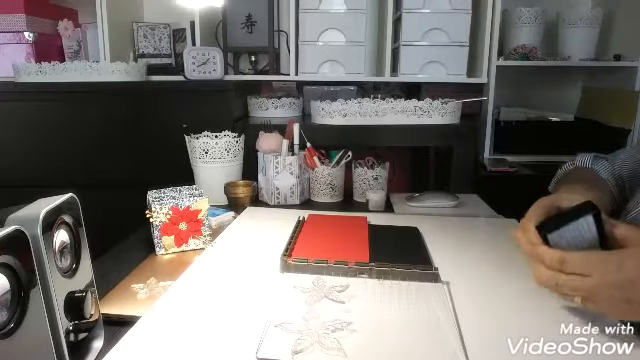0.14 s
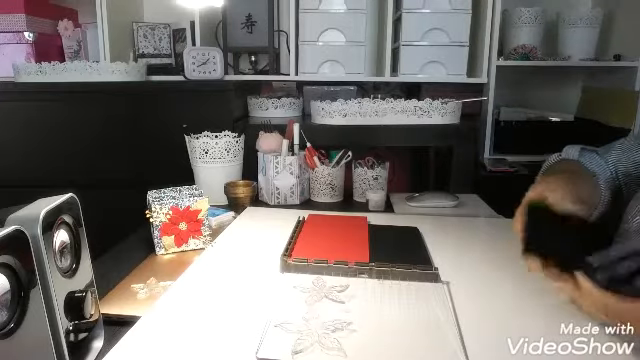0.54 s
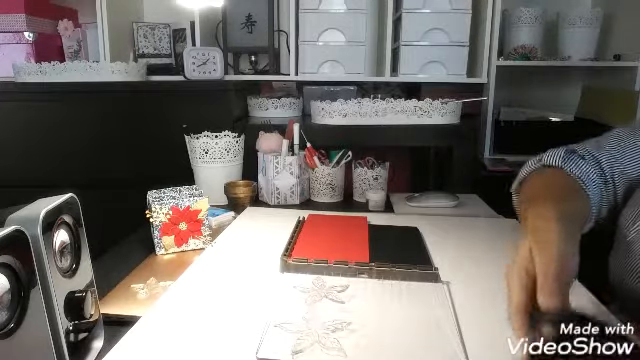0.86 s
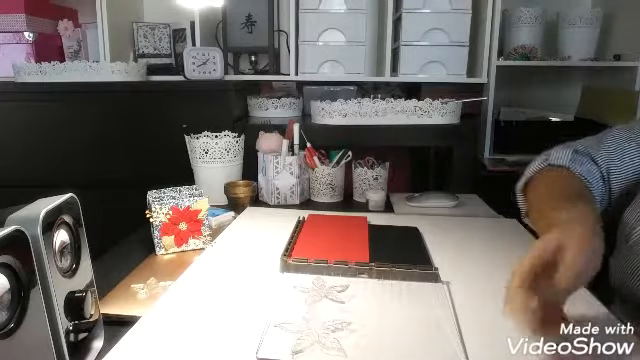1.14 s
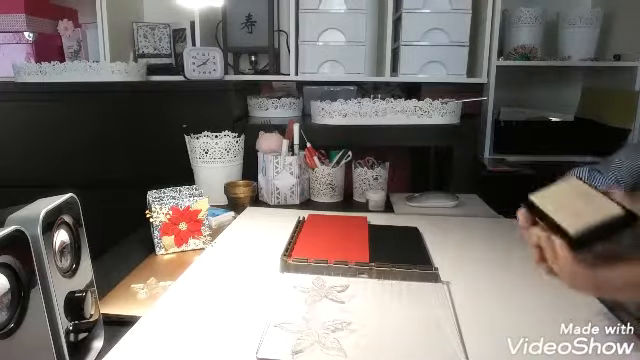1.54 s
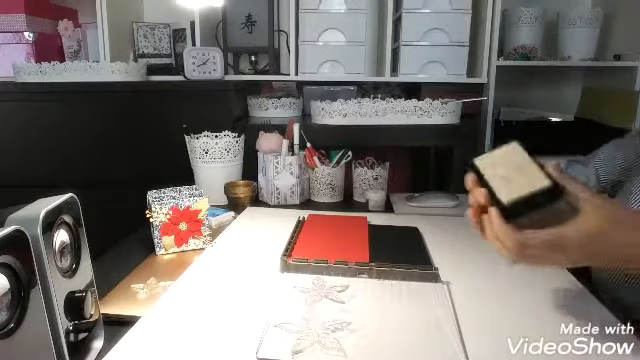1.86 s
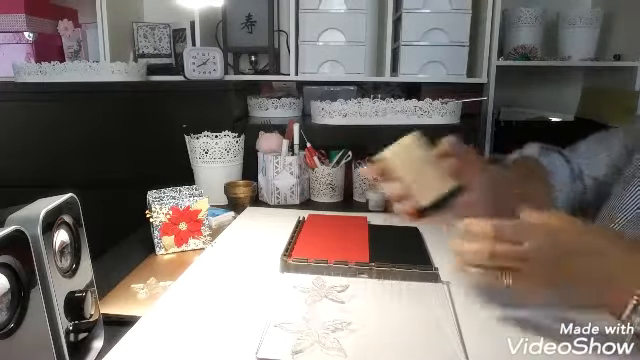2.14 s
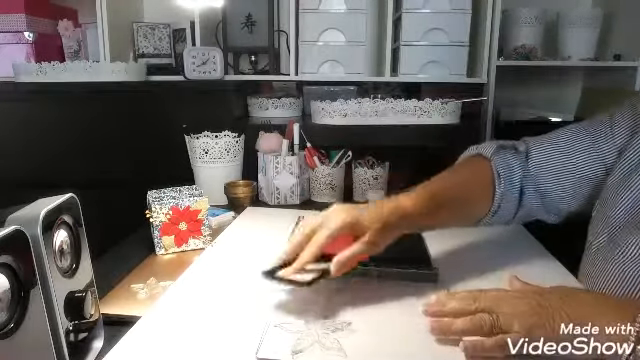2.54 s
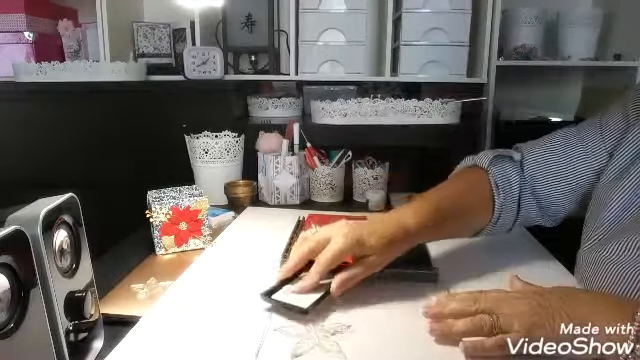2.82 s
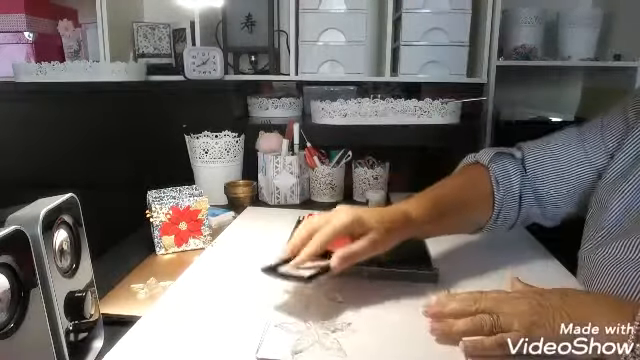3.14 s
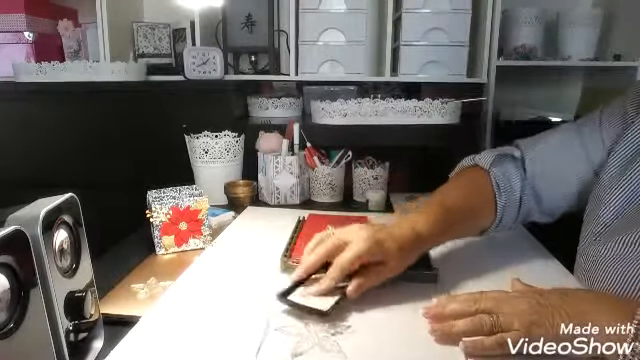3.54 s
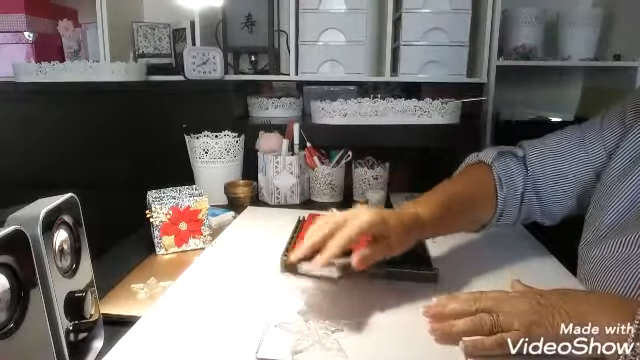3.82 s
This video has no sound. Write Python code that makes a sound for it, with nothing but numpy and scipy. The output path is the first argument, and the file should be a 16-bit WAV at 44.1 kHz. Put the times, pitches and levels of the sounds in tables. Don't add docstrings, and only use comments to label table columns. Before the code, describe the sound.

Close, nearly mono phone pickup in a small furnished room with faint hiss. Small finger creaks, then a plastic lid bounces and settles on a table in a sharp quick clatter around one second. After a quiet reach with faint sleeve rub, an ink pad is dabbed on a stamp: soft muffled pats, several firmer hard plastic knocks and tiny crackles as it lifts.

```python
import sys
import numpy as np
from scipy import signal
from scipy.fft import rfft, irfft
from scipy.io import wavfile
from scipy.ndimage import uniform_filter1d

SR = 44100
rng = np.random.default_rng(int(sys.argv[2]) if len(sys.argv) > 2 else 0)


def to_wav(s):
    ch = np.atleast_2d(s).T
    pcm = np.round(np.clip(ch, -1, 1) * 32767)
    wavfile.write(sys.argv[1], SR, pcm.astype(np.int16))


def undo_db(level):
    steps = np.asarray(level, float) / 20
    return 10 ** steps


N = 258988

# frequency in Hz, level in dB, 60 dB decay in seconds.
CASE_MODES = [(716, -34, 0.51), (760, 18, 0.87), (1300, 5.5, 0.22), (1290, -25, 0.098),
              (1592, -31.5, 0.048), (1622, -48.5, 0.41), (1836, -1, 0.44), (2055, 27.5, 0.074),
              (2120, -39, 0.3), (2640, -11, 0.043), (2860, -18, 0.61), (3230, -2, 0.17), (3580, 13, 0.028),
              (3770, -41.5, 0.48)]
# frequency in Hz, level in dB per Hz.
PLASTIC_CRACK = [(1470, -2), (2500, -8.5), (2850, -5.5), (3460, -8), (4170, -5.5), (6150, -5), (7830, -10),
                 (9290, -19), (11500, -13), (14000, -37), (16000, -65)]
CASE_RING = dict(shorten=.075, ring_db=-8)


def colour(x, points):
    hz, db = np.transpose(points)
    grid = np.fft.rfftfreq(4096, 1 / SR)
    log_gain = np.interp(np.log(grid + 1), np.log(hz), db) * np.log(10) / 20
    cepstrum = irfft(log_gain)
    cepstrum[1:2048] *= 2
    cepstrum[2049:] = 0
    response = irfft(np.exp(rfft(cepstrum)))
    return signal.fftconvolve(x, response)[:len(x)]


def level(x, db):
    return x * undo_db(db) / np.sqrt(np.mean(x ** 2))


def peak(x, db):
    return x * undo_db(db) / np.sqrt(uniform_filter1d(x ** 2, size=176).max())


def add(out, s, x):
    i = int(s * SR)
    out[i:i + len(x)] += x[:N - i]


def microphone_hiss():
    # frequency in Hz, level in dB per Hz.
    hiss_colour = [(15, -47), (26, -0.5), (54, -20), (85, -6), (180, -5.5), (414, -10), (572, -12.5),
                   (1030, -12), (1150, -12.5), (1670, -14.5), (2310, -17.5), (10100, -29.5), (14800, -28),
                   (16000, -49.5)]
    # frequency in Hz, side minus mid in dB.
    hiss_width = [(60, -1), (110, -19), (200, -14), (380, -10.5), (700, -9.5), (1290, -13.5), (2380, -8),
                  (4400, -5), (8120, -2), (15000, -6)]
    mid = colour(rng.standard_normal(N), hiss_colour)
    side = colour(colour(rng.standard_normal(N), hiss_colour), hiss_width)
    return (mid + side * np.array([[1], [-1]])) * undo_db(-71) / np.std(mid)


def room(x):
    # frequency in Hz, 60 dB decay in seconds.
    room_decay = [(100, 0.22), (300, 0.23), (1200, 0.24), (4000, 0.22), (12000, 0.22)]
    start_s = 0.00043
    t = np.arange(SR // 2) / SR
    hz, t60 = np.transpose(room_decay)
    tail = 0
    for centre in 60 * 2 ** np.arange(0, 8, .5):
        edges = [centre / 2 ** .25, centre * 2 ** .25]
        band = signal.butter(2, edges, "bandpass", fs=SR, output="sos")
        fade = np.exp(-np.log(1000) * t / np.interp(np.log(centre), np.log(hz), t60))
        tail = tail + signal.sosfilt(band, rng.standard_normal(len(t))) * fade
    tail = tail * (1 - np.exp(-(t / start_s) ** 2))
    return signal.fftconvolve(x, tail / np.sqrt(np.sum(tail ** 2)))[:N]


def early_echoes(near):
    # delay in seconds, level in dB.
    bounces = [
        (.0012, -16.5),
        (.0044, -13.5),
        (.009, -6),
        (.0132, -0.5),
        (.02, -10),
    ]
    dull = colour(near, [(2500, -3.5), (6000, -13.5), (14000, -8)])
    out = np.zeros(N)
    for k, (s, db) in enumerate(bounces):
        out += undo_db(db) * np.roll(dull, int(s * SR)) * (-1) ** k
    return out


def rustle():
    # start, fullest moment and end in seconds, level in dB.
    reaches = [
        (0.52, 0.703, 1.05, -71),
        (1.298, 1.761, 2.45, -71),
    ]
    # frequency in Hz, level in dB.
    cloth_colour = [(300, -31), (800, -8), (1400, -2.5), (2400, -4), (4000, -14), (7000, -12.5),
                    (12000, -26)]
    edge_db = -11
    t = np.arange(N) / SR
    gain = 0
    for start_s, full_s, end_s, db in reaches:
        swell_db = np.interp(t, [start_s, full_s, end_s], [edge_db, 0, edge_db], -60, -60)
        gain = gain + undo_db(db + swell_db)
    flutter = level(uniform_filter1d(rng.standard_normal(N), size=1500), 0)
    cloth = level(colour(rng.standard_normal(N), cloth_colour), 0)
    return uniform_filter1d(gain, size=2000) * undo_db(0.53 * flutter) * cloth


def ring(x, modes, shorten, scatter_db):
    t = np.arange(len(x)) / SR
    hz, db, t60 = np.transpose(modes)[:, :, None]
    gain_chance, pitch_chance = rng.standard_normal((2, len(modes), 1))
    fade = np.exp(-np.log(1000) * t / (shorten * np.clip(t60, .02, .3)))
    tone = np.sin(2 * np.pi * hz * (1 + 0.031 * pitch_chance) * t)
    bank = undo_db(db + scatter_db * gain_chance) * fade * tone
    return signal.fftconvolve(x, bank.sum(0))[:len(x)]


def chatter(time_s, swell, first, spread_db):
    t = np.arange(SR // 4) / SR / max(time_s, .001)
    slips = rng.standard_normal(len(t)) * undo_db(spread_db * rng.exponential(size=len(t)))
    force = level(slips, 0) * t ** swell * np.exp(-t)
    force[:5] += first * np.hanning(5) * rng.choice([-1, 1])
    return force


def fingers():
    # start in seconds, peak level in dB, ring in Hz, crack in dB relative to the peak.
    creaks = [(0.016, -56.5, 1084, 3), (0.350, -50, 1190, -2.5), (0.356, -47, 1510, -34),
              (0.373, -50.5, 1880, -36), (0.597, -58.5, 820, -16), (0.625, -57, 866, 3),
              (1.559, -62, 1510, 12), (1.931, -57.5, 1246, -21), (2.343, -47.5, 2465, -3),
              (2.364, -71, 2150, -6.5), (5.752, -55, 3395, -18)]
    out = np.zeros(N)
    for s, db, hz, crack_db in creaks:
        force = chatter(.004, swell=0.043, first=13, spread_db=5.5)
        modes = [(hz, 0, .03), (1.12 * hz, -6, .02), (0.72 * hz, -8, .02)]
        creak = ring(force, modes, 1.0, scatter_db=4.5)
        add(out, s, peak(creak, db - 7.0) + peak(colour(force, PLASTIC_CRACK), db + crack_db - 13))
    return out


def snaps_and_squeaks():
    # start in seconds, peak level in dB, frequency in Hz.
    squeak_rows = [(.378, -68, 3400), (.625, -67, 3360), (.63, -67, 2160), (.799, -72, 6150),
                   (0.884, -67, 5570), (0.924, -63, 6350), (.947, -46.5, 822), (0.947, -73, 582),
                   (.987, -48, 860), (1.015, -44, 2440), (1.09, -41, 2560)]
    # start in seconds, peak level in dB, frequency in Hz.
    snap_rows = [(1.175, -41, 6550), (1.199, -45, 6000), (1.2135, -45.5, 5240), (1.232, -64, 4600),
                 (2.3443, -55, 1530), (2.341, -82.5, 656), (2.3425, -53.5, 4600), (2.344, -65, 10000),
                 (2.397, -62.5, 10400), (2.4484, -63, 6870), (2.978, -64, 7600), (3.085, -61, 6100),
                 (3.095, -66, 7800), (4.323, -66, 5900), (4.363, -60, 5930), (5.419, -65.5, 7600),
                 (5.466, -59.5, 5430)]
    out = np.zeros(N)
    t = np.arange(SR // 6) / SR
    rows = [(s, db, hz, min(120 / hz, .2)) for s, db, hz in squeak_rows]
    rows += [(s, db, hz, 0.0016) for s, db, hz in snap_rows]
    for s, db, hz, t60 in rows:
        mode = np.exp(-np.log(1000) * t / t60) * np.sin(2 * np.pi * hz * t)
        add(out, s, peak(np.convolve(mode, rng.standard_normal(10))[:len(t)], db))
    return out


def contacts(events, modes, crack, swell, first, spread_db, shorten, ring_db,
             typical_db, table_db, boom_db, crack_db, dulling):
    # frequency in Hz, level in dB, 60 dB decay in seconds.
    table_modes = [(72.6, -3, 0.6), (79, -19, 0.1), (99.8, -6.5, 0.25), (109.5, -5, 0.093),
                   (142.5, -0.5, 0.14)]
    # frequency in Hz, level in dB.
    wood_colour = [(60, -40.5), (110, -7.5), (190, -2), (270, 5), (400, -7.5), (600, -3.5), (1200, -37.5)]
    # frequency in Hz, level in dB.
    body_colour = [(200, -22.5), (400, -5), (800, 5), (1000, -1.5), (1300, 6), (1700, -5), (2300, -7),
                   (2900, -20), (4000, -14.5), (6000, -24), (10000, -64.5)]
    thump_share, crack_share = 0.62, 0.16
    out = np.zeros(N)
    t = np.arange(SR // 4) / SR
    for s, db, time_s, weight_db in events:
        force = chatter(time_s, swell, first, spread_db)
        clear = peak(ring(force, modes, shorten, scatter_db=3), ring_db)
        plastic = clear + peak(colour(force, body_colour), 0)
        boom = ring(np.abs(force), table_modes, 1.0, scatter_db=8.0) * (1 - np.exp(-(t / 0.012) ** 2))
        thump = peak(colour(force, wood_colour), db + table_db + thump_share * weight_db - 6.5)
        thump = thump + peak(boom, db + boom_db + weight_db)
        edge_db = db + crack_db - dulling * (db - typical_db) + crack_share * weight_db
        edge = peak(colour(force, crack), edge_db - 2.5)
        add(out, s, peak(plastic, db - 6.5) + thump + edge)
    return out


def lid_clatter():
    # start in seconds, peak level in dB, chatter time in seconds, weight into the table in dB.
    lid_hits = [(.946, -40, 0.013, 33.5), (.986, -37.5, 0.016, 12), (1.014, -26, 0.0042, 11.5),
                (1.027, -26, 0.0026, -17), (1.039, -29.5, 0.0024, 9), (1.09, -21, 0.0034, 10.5),
                (1.108, -53.5, 0.006, 6), (1.132, -23.5, 0.007, -1), (1.159, -21.5, 0.019, 10),
                (1.173, -37, 0.0056, 7.5), (1.1855, -13.5, 0.004, -14), (1.199, -32, 0.016, -28.5),
                (1.214, -20, 0.0049, -4), (1.231, -26, 0.012, -26.5)]
    # frequency in Hz, level in dB, 60 dB decay in seconds.
    lid_modes = [(510, -2, 0.34), (880, -5.5, 0.34), (1050, -22, 0.81), (1313, 4, 0.35), (1410, -17, 0.13),
                 (1620, 4, 0.29), (1750, -23, 0.35), (2090, -16, 0.076), (2270, -11.5, 0.24),
                 (2290, -6, 0.31), (2800, -51, 0.54), (3900, -14, 0.41)]
    # frequency in Hz, level in dB per Hz.
    lid_crack = [(1470, -10), (2500, -4.5), (3230, -10.5), (3830, -17), (4210, -3), (7830, -10.5),
                 (9360, -22.5), (11000, -20), (12200, -45), (13600, -17), (16000, -49)]
    return contacts(lid_hits, lid_modes, lid_crack, swell=0.032, first=6.1, spread_db=3.5,
                    shorten=.1, ring_db=-6,
                    typical_db=-32, table_db=-15, boom_db=-40.5, crack_db=-13.5, dulling=0.57)


def case_knocks():
    # start in seconds, peak level in dB, chatter time in seconds, weight into the table in dB.
    knock_rows = [
        (3.194, -20.5, 0.0025, -2),
        (3.781, -23, 0.0035, 1.5),
        (4.418, -22, 0.0029, -1.5),
        (4.742, -44.5, 0.003, 2),
        (5.031, -32.5, 0.0016, 4),
        (5.509, -25.5, 0.012, 6),
    ]
    return contacts(knock_rows, CASE_MODES, PLASTIC_CRACK, swell=0.015, first=2.98, spread_db=2.5,
                    **CASE_RING,
                    typical_db=-24, table_db=-9, boom_db=-27.5, crack_db=-15, dulling=-0.34)


def pad_dabs():
    # start in seconds, peak level in dB, chatter time in seconds, weight in dB.
    press_rows = [(2.876, -40.5, 0.01, -10), (3.436, -44, 0.008, 4), (3.681, -36.5, 0.0044, -11),
                  (3.748, -53.5, 0.023, 22), (4.088, -45.5, .0095, 3), (4.094, -46, 0.0035, -1.5),
                  (4.387, -49.5, 0.019, -8), (4.753, -39.5, 0.0057, 0.5), (4.972, -48.5, 0.017, 0),
                  (5.299, -59, 0.0091, 12), (5.781, -45, .0079, -5.5)]
    squeeze_rows = [(2.861, -46.5, 0.0068, -9), (2.926, -41.5, 0.0066, -8), (3.161, -43.5, 0.0039, 8.5),
                    (3.485, -46, 0.021, 0), (3.561, -54.5, 0.013, -7), (4.168, -47.5, 0.0073, -10),
                    (5.226, -45.5, 0.0029, 1.5), (5.274, -46.5, 0.011, 0.5), (5.324, -43.5, 0.0041, -14),
                    (5.488, -39.5, 0.0044, -4), (5.608, -51, 0.0021, 5.5), (5.824, -51, 0.012, 0)]
    lift_rows = [
        (2.989, -52, 0.0043, 7),
        (3.085, -57.5, 0.016, -9),
        (3.109, -58.5, 0.021, 2),
        (3.663, -53, 0.035, 14.5),
        (4.323, -60, 0.0099, -3),
        (4.335, -49.5, 0.0063, -0.5),
        (4.363, -59, .0025, 11),
        (5.416, -63, 0.034, 16),
        (5.444, -52, 0.019, 6),
    ]
    # frequency in Hz, level in dB per Hz.
    ink_crackle = [(1470, -18.5), (2500, -11), (2700, 3.5), (3280, -6.5), (5310, -2), (5970, -7.5),
                   (7590, -8), (8940, -15.5), (10900, -9.5), (14100, -19.5), (16000, -58)]
    press = dict(typical_db=-45, table_db=-11.5, boom_db=-13.5, crack_db=-13, dulling=0.033)
    squeeze = dict(typical_db=-46, table_db=-9.5, boom_db=-17.5, crack_db=-18.5, dulling=.1)
    lift = dict(typical_db=-62.5, table_db=-9, boom_db=-29, crack_db=-6.5, dulling=0.35)
    out = np.zeros(N)
    for rows, blow in [(press_rows, press), (squeeze_rows, squeeze), (lift_rows, lift)]:
        out += contacts(rows, CASE_MODES, ink_crackle, swell=0.44, first=2.29, spread_db=3.0,
                        **CASE_RING, **blow)
    return out


def scene():
    near = lid_clatter() + case_knocks() + pad_dabs() + fingers() + snaps_and_squeaks()
    mid = near + early_echoes(near) + undo_db(-3) * room(near) + rustle()
    side_colour = [(500, -75.0), (2000, -14.0), (5000, -1.5), (12000, 5.0)]
    side = undo_db(-22) * room(colour(near, side_colour))
    return np.array([mid + side, mid - side])


def mute_before_attacks(x):
    # centre in seconds, muted above this frequency in Hz.
    mutes = [
        (.934, 700),
        (.98, 3000),
        (1.004, 3500),
        (1.076, 4500),
        (2.328, 700),
        (2.4215, 250),
        (2.4435, 250),
        (3.187, 1500),
        (3.674, 3000),
        (3.768, 3000),
    ]
    mute_s, mute_db = .0075, -30
    n = int(mute_s * SR)
    for s, above_hz in mutes:
        a = int((s - mute_s / 2) * SR)
        treble = signal.butter(4, above_hz, "highpass", fs=SR, output="sos")
        upper = signal.sosfiltfilt(treble, x[:, a - n:a + 2 * n])
        x[:, a:a + n] -= (1 - undo_db(mute_db)) * upper[:, n:2 * n] * signal.windows.tukey(n, .3)
    return x


def masked(x):
    mask_hz, mask_db = 8300, -44
    hz, _, z = signal.stft(x, SR, nperseg=1024)
    power = np.mean(np.abs(z) ** 2, axis=0)
    bands = np.repeat(power[:512].reshape(32, 16, -1).sum(1), 16, axis=0)
    uneven = undo_db(8.0 * rng.standard_normal((32, power.shape[1])))
    bands *= np.repeat(uneven, 16, axis=0)
    weak = (bands < undo_db(2 * mask_db) * power.sum(0)) & (hz[:512, None] > mask_hz)
    z[:, :512] *= np.where(weak, .05, 1)
    return signal.istft(z, SR, nperseg=1024)[1][:, :N]


def band_limit(x):
    return signal.sosfilt(signal.butter(12, 16470, fs=SR, output="sos"), x)


def record(dry):
    # frequency in Hz, level in dB.
    port_notch = [(7600, 0.5), (8500, 2), (9200, -0.5), (9900, 4.5), (10500, 4.5)]
    bass_cut = signal.butter(6, 62, "highpass", fs=SR, output="sos")
    x = signal.sosfilt(bass_cut, dry) + microphone_hiss()
    x = mute_before_attacks(x) - .0004
    x = masked(np.array([colour(channel, port_notch) for channel in x]))
    treble_cut = signal.ellip(8, .2, 60, 15900, fs=SR, output="sos")
    x = signal.sosfilt(treble_cut, x)
    return band_limit(x)


dry = scene()
out = record(dry)
to_wav(out)
```